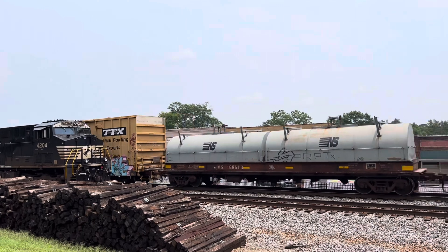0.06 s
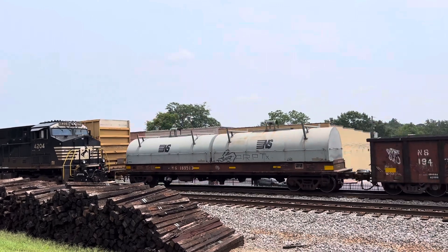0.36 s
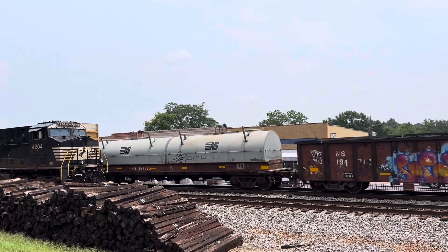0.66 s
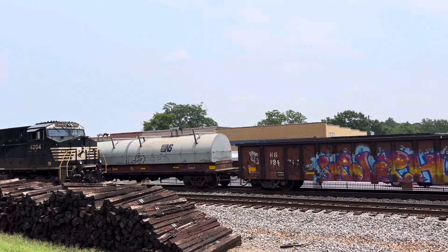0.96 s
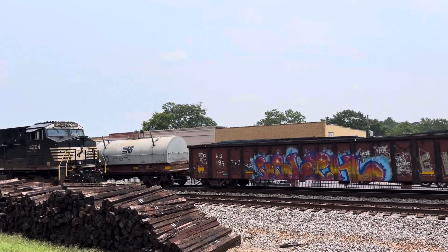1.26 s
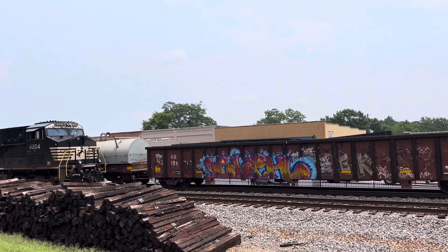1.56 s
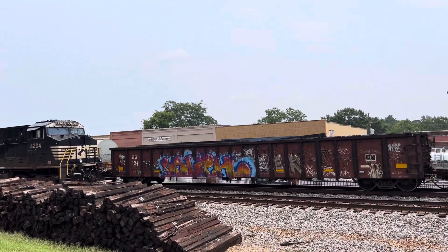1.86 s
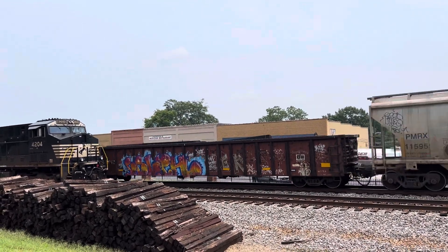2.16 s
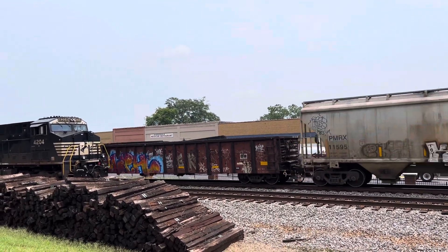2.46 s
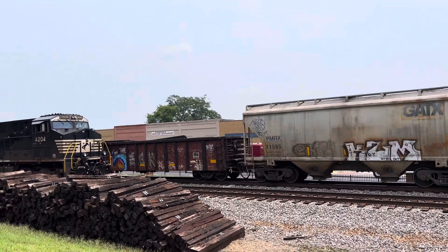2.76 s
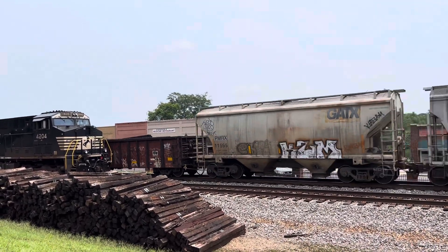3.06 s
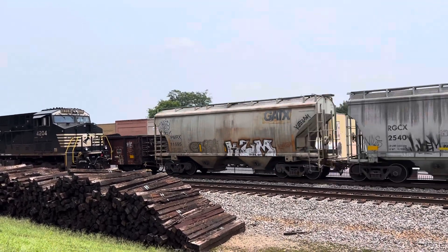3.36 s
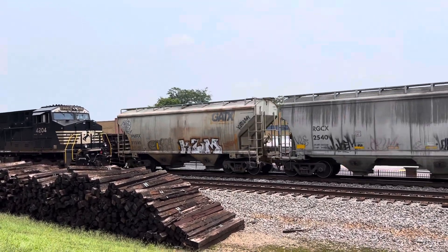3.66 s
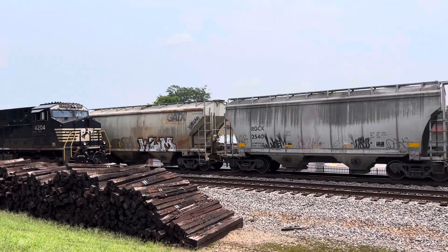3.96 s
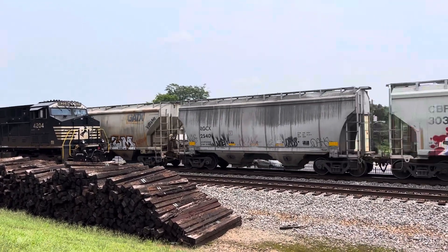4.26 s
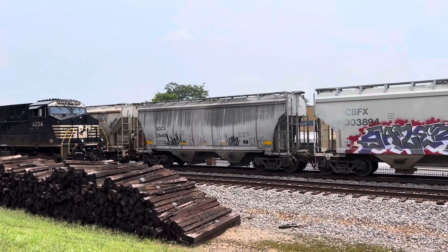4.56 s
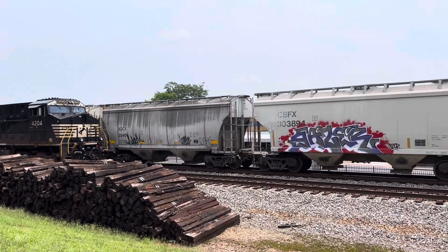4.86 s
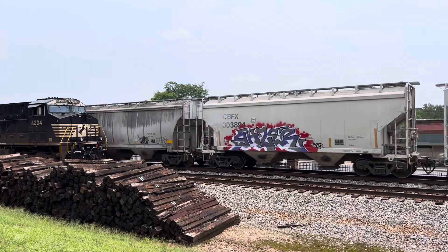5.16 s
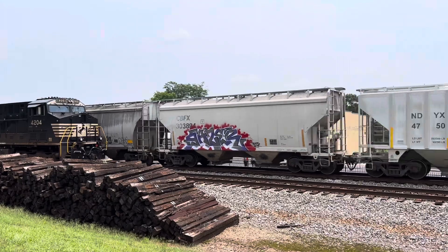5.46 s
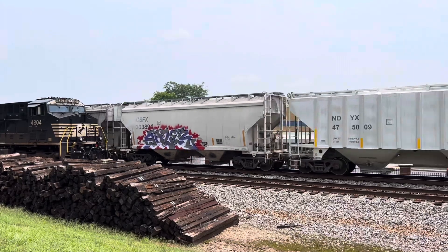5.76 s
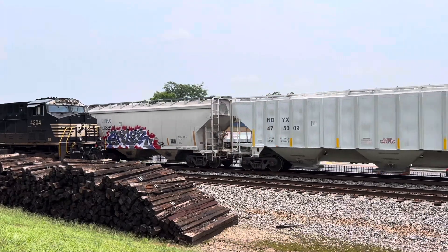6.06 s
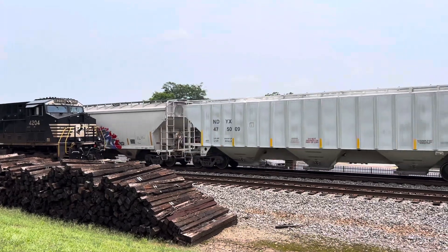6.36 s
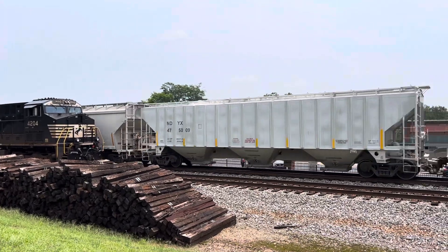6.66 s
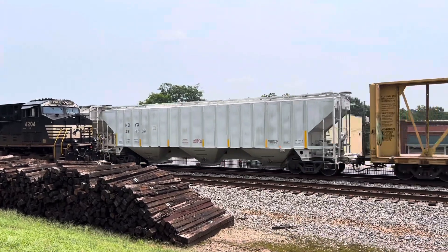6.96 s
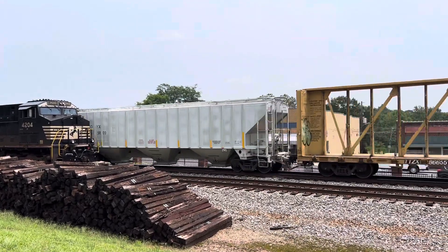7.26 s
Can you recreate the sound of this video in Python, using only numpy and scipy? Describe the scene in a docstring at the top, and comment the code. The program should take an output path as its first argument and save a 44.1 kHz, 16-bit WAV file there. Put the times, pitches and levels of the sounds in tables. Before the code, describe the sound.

A freight train rolls steadily past with a deep rumble, rattling wagons, knocks and the ringing hiss of steel wheels.

```python
"""A freight train rolls past at a steady speed, some twenty metres away across open ballast.
Its hollow wagon bodies boom on their springs, their walls drum, and slack running gear knocks.
Rough treads force track bed, rails and steel wheels into vibration: a roar, a ringing and a hiss.
The roar grows wagon by wagon and throbs with each turn of the wheels. Near the end one rough wheel
draws near from the right, grinding and scuffing in quick swells, with a loud clank and a faint one."""
import sys
import numpy as np
from scipy import signal
from scipy.fft import rfft, irfft, next_fast_len
from scipy.io import wavfile
from scipy.ndimage import uniform_filter1d, map_coordinates

SR = 44100
rng = np.random.default_rng(int(sys.argv[2]) if len(sys.argv) > 2 else 0)


def to_wav(sig):
    """Store sig (one row per channel, or 1-D mono) as 16-bit WAV at the path in sys.argv[1].

    Samples outside -1..1 are clipped; the rate is SR.
    """
    pcm = np.clip(np.atleast_2d(sig), -1, 1) * 32767
    pcm = np.round(pcm).astype(np.int16)
    wavfile.write(sys.argv[1], SR, pcm.T)  # frames by channels


N = 325899
TIME = np.arange(N) / SR

# coherence of the two channels: f/Hz, coherence (0-1)
COHERENCE = [(50, .98), (150, .94), (300, .87), (550, .65), (800, .52), (1100, .62), (1600, .22),
             (1900, .25), (2300, .5), (3000, .4), (4300, .6), (5300, .25), (7200, .35), (8500, .8),
             (12000, .8)]
# the open track lies to the right, so the left channel lags: f/Hz, lag/ms
LEFT_DELAY = [(100, 0), (250, .13), (400, .37), (600, .53), (920, .32), (1250, .32), (2100, .46),
              (2700, .39), (3300, .47), (4500, .43), (6000, .48), (7500, .38), (8500, .355), (11800, .34)]
# boom of the bodies, heavier as each bogie takes its load past: t/s, level/dB
BOOM_LEVELS = [(0, -27.5), (0.55, -27.5), (1.08, -24), (1.2, -22.5), (1.72, -20), (1.87, -27),
               (2.25, -21.5), (2.35, -19.5), (2.87, -21), (3.02, -26), (3.13, -20.5), (3.5, -19),
               (3.8, -17), (4.15, -17.5), (4.42, -20.5), (4.7, -18.5), (5.4, -16), (6.37, -18.5),
               (6.85, -16.5), (7.39, -21.5)]
# weight of the deepest swaying within the boom: t/s, gain/dB
SWAY_DEPTH = [(0, -2), (2.2, 0), (3.6, 6), (5.2, 8.5), (7.39, 5)]
# steady shaking of the walls: t/s, drumming/dB, rattle/dB
WALL_SHAKING = [(0, -29, -31.5), (0.8, -32, -33.5), (1.3, -21.5, -30), (1.85, -25, -33), (2.1, -28, -24),
                (2.27, -22, -28), (2.45, -18.5, -28.5), (2.86, -13, -21), (2.94, -23, -30),
                (3.05, -17.5, -23), (3.35, -17, -22.5), (3.8, -17, -27), (4.45, -22, -26.5),
                (5.25, -21, -26), (5.8, -17.5, -21.5), (6.25, -21, -23), (7.39, -17.0, -21.0)]
# harder shaking over uneven track: t/s, half length/s, drumming/dB, rattle/dB
SHAKING_BOUTS = [(1.665, 0.031, -17, -25), (1.832, 0.065, -17.5, -22.5), (1.986, 0.035, -39, -23),
                 (2.35, 0.032, -18, -29), (2.58, 0.023, -21, -29), (2.723, .04, -15.5, -25),
                 (2.973, 0.018, -10.5, -32), (3.325, .025, -14, -19), (3.56, 0.058, -18, -19.5),
                 (5.03, 0.036, -13, -27), (5.497, 0.06, -16, -19.5)]
# spectra of the bodies' boom and the walls' drumming and rattle: f/Hz, level/dB
BOOM_SPECTRUM = [(20, -39), (31, -34), (40, -18), (50, -9.5), (63, -3), (80, -6), (100, -8.5), (125, -15.5),
                 (190, -40)]
DRUM_SPECTRUM = [(70, -12), (115, 1), (160, 0), (210, -4), (270, -17), (420, -29)]
RATTLE_SPECTRUM = [(150, -13), (240, 0.5), (310, -0.5), (410, -2), (520, -12), (800, -45), (1400, -47)]
# rolling contact: t/s, track bed/dB, rails/dB, wheels/dB, hiss/dB
ROLLING_LEVELS = [(0, -34.5, -43, -37.5, -48), (0.9, -33, -40, -33, -45.5), (1.85, -33, -40, -36.5, -43),
                  (2.25, -31, -37.5, -34.5, -40), (3.4, -27, -37, -34.5, -38),
                  (4.2, -28.5, -35, -31.5, -38.5), (4.9, -28.5, -35.5, -33, -40),
                  (5.5, -26.5, -36, -32.5, -41), (6.25, -24, -40, -34, -38.5),
                  (6.7, -26.5, -39.5, -37, -37.5), (7.39, -23.5, -33.5, -37, -37)]
# spectra of track bed, rails, wheel discs, rims and hiss: f/Hz, level/dB
BED_SPECTRUM = [(300, -12), (450, 2), (570, 3), (780, 1), (880, -0.5), (1000, 0.5), (1150, -13),
                (1500, -18)]
RAIL_SPECTRUM = [(700, -47), (1100, 5), (1400, 6.5), (1700, 1.5), (1950, -12.5), (2500, -17.5)]
DISC_SPECTRUM = [(1000, -26), (1600, 0.5), (1950, 4.5), (2300, 2.5), (2750, 0.5), (3050, -2), (3700, -33),
                 (5000, -23)]
RIM_SPECTRUM = [(2600, -16), (3200, 1.5), (3600, 1.5), (4400, 1), (5000, -0.5), (6000, -2.5), (8000, -10.5)]
HISS_SPECTRUM = [(3500, -16), (6200, 0), (7300, -2), (8500, -.5), (10300, -6), (12600, -6.5), (13600, -20),
                 (15500, -26)]
# upper modes of the wheels: f/Hz, width/Hz, level/dB
UPPER_MODES = [(1746, 150, -2), (1945, 76, 0), (2696, 140, -4), (3120, 115, -3.5), (3316, 82, 1),
               (3964, 120, -3.5), (4450, 150, -11.5), (5050, 140, -9)]
# wheel size, and so pitch, varies from bogie to bogie: t/s, shift/semitones
WHEEL_PITCH = [(0, 0.095), (1.1, 0.06), (2.2, -.25), (3.0, 0.054), (4.3, 0.067), (5.3, 0), (6.4, 0.18),
               (7.39, 0.097)]
# modes of frames and walls: f/Hz, level/dB, T60/s
FRAME_RESONANCES = [(132, 11.5, 0.036), (165.4, 0.5, 0.1), (221, 1, 0.084), (295, -2, 0.049),
                    (343, -2, 0.11), (440, -1, 0.026), (522, -4, 0.035), (666, -6, 0.01),
                    (806, -14.5, 0.021)]
# knocks of the running gear: t/s, deep thud/dB, hollow bonk/dB, hard clack/dB
GEAR_KNOCKS = [(0.257, -31, -27, -14), (1.629, -32, -17.5, -26), (1.978, -22, -12, -21),
               (2.312, -21, -25, -26), (2.399, -18, -18, -26), (2.488, -15.5, -24, -28),
               (2.684, -17, -11, -18), (2.748, -16, -10.5, -13), (2.805, -23, -20, -24),
               (2.842, -13.5, -27, -23), (2.877, -19, -11, -20), (2.902, -10, -18, -24),
               (2.958, -22, -21, -13), (3.098, -15, -16, -22), (3.278, -24, -10, -7),
               (3.343, -8.5, -13.5, -21), (3.391, -24, -23, -5), (3.437, -17, -8, -7),
               (3.465, -19, -18, -18), (3.519, -21, -11.5, -8), (3.598, -23, -13.5, -11),
               (3.834, -13.5, -24, -28), (4.672, -27, -32, -26), (5.24, -17, -23, -15),
               (5.459, -12, -13, -13), (5.572, -14, -26, -18), (5.863, -22, -20, -22),
               (6.112, -28, -20, -9), (6.651, -11, -19, -13), (7.11, -30, -25, -3)]
# heavy lurches of a body on its springs: t/s, peak/dB
BODY_LURCHES = [(0.121, -13), (.944, -7.5), (1.21, -11), (1.322, -10), (1.42, -10), (1.526, -9),
                (1.66, -12), (1.787, -9.5), (2.41, -17), (2.667, -11), (2.759, -9.5), (2.829, -7),
                (3.105, -4), (3.202, -6), (3.313, -7.5), (3.41, -5), (3.489, -14), (3.599, -6),
                (3.689, -10), (3.868, -10), (3.98, -9.5), (4.048, -7), (4.105, -7), (4.218, -7),
                (4.567, -8), (4.902, -8), (4.982, -8), (5.286, -4), (5.397, -14), (5.451, -12),
                (5.801, -11), (6.518, -7), (6.718, -9), (6.972, -8), (7.191, -5), (7.279, -4.5)]
# single wheels singing out: t/s, f/Hz, level/dB, half length/s, purity (0-1)
FLANGE_SQUEAKS = [(0.33, 2150, -40, .1, .1), (.3, 4380, -46, 0.22, .4), (0.557, 3400, -50, 0.17, .3),
                  (0.96, 3340, -41, 0.14, .4), (1.17, 3330, -40, 0.08, 0.6), (1.42, 3320, -41, .15, .35),
                  (0.93, 4300, -46, .12, 0.5), (1.147, 3960, -39, .12, .15), (1.1, 4150, -50, .25, 0),
                  (1.3, 4480, -45, .25, 0), (1.682, 3315, -42, 0.12, 0.4), (1.653, 3990, -45, 0.12, .5),
                  (1.917, 3925, -47, 0.13, 0.5), (2.3, 3300, -47, .2, .4), (2.39, 4860, -39, 0.047, 0),
                  (2.557, 3090, -48, .3, .2), (2.93, 4030, -42, 0.11, .3), (3.37, 3100, -36, .07, .3),
                  (3.63, 5640, -44, .06, .1), (3.699, 3120, -53, .25, .2), (3.84, 4970, -41, .08, .3),
                  (4.28, 2240, -38, .07, .1), (4.341, 3325, -38, .13, 0.8), (4.9, 3310, -45, 0.23, .3),
                  (5.005, 2620, -40, 0.089, .4), (5.094, 3960, -44, .1, .3), (5.302, 2390, -38.5, 0.087, 0),
                  (5.973, 4380, -39, .08, 0.2), (6.39, 2750, -42, 0.09, .2), (6.412, 3340, -41, .1, 0.06),
                  (6.42, 4520, -47, .14, 0), (6.659, 4020, -37, .04, 0), (6.951, 3140, -45, 0.11, .2),
                  (7.36, 2190, -35, .07, 0), (7.37, 2740, -34.5, .06, 0)]
# modes of one bogie's worn wheels: f/Hz, width/Hz, level/dB
WORN_WHEEL_MODES = [(1310, 170, -1), (1465, 60, 1.5), (1625, 70, -1), (2180, 110, -2), (4170, 90, -11),
                    (4530, 90, -9), (5020, 80, -8)]
# hopper wagons going by: t/s, half length/s, level/dB
HOPPER_PASSES = [(4.848, 0.54, -25), (6.805, 0.73, -21)]
# their resonances: f/Hz, width/Hz, level/dB
HOPPER_RESONANCES = [(167, 25.6, 0.5), (370, 113, -14.5), (436, 55, -14.5), (565, 65, -21.5),
                     (712, 100, -18), (875, 150, -20.5)]
# approach of the rough wheel: t/s, left lag/ms, grinding/dB, ringing/dB
ROUGH_APPROACH = [(5.5, 0.43, -52, -61), (5.88, 0.26, -27, -46), (6.3, 0.24, -30, -37),
                  (6.75, 0.24, -26, -44), (7.0, 0.2, -25, -37), (7.39, 0.11, -31.5, -47)]
# its swells, about one a turn: t/s, grinding/dB, ringing/dB
ROUGH_SWELLS = [(6.4, -36, -32.5), (6.64, -25, -36), (6.885, -21, -37), (7.07, -33, -44),
                (7.385, -20.5, -33)]
# spectra of its grinding, ringing and scuffing: f/Hz, level/dB
GRIND_SPECTRUM = [(420, -4), (700, -3.5), (860, 3.5), (1010, 2), (1150, -5), (1420, 0), (1570, 6),
                  (1700, -11.5), (2150, -5), (2700, -16)]
RING_SPECTRUM = [(2100, 3.5), (2450, 1), (2760, -1), (2920, -7), (3110, -6), (3350, 4), (3650, 5),
                 (4000, 7), (4600, 0), (5500, -21.5)]
SCUFF_SPECTRUM = [(400, 9), (900, 7), (1350, 7), (1580, 11), (1800, 2), (2200, -2), (3200, 12), (4500, 7.5),
                  (7000, 6.5), (8500, 7.5), (10500, 1), (12500, -2), (15500, -12)]
# its rough patch rubbing the rail: t/s, peak/dB
PATCH_SCUFFS = [(6.311, -31), (6.375, -31), (6.545, -34), (6.625, -37), (6.862, -30), (6.893, -28),
                (6.912, -34), (7.04, -29), (7.108, -28.5), (7.139, -29)]
# its flat meeting the rail: t/s, level/dB
FLAT_CLANKS = [(6.867, -15.5), (7.035, -27)]
# modes that ring in a clank: f/Hz, level/dB, T60/s
CLANK_RESONANCES = [(1010, -6, 0.32), (1320, -5, 0.33), (1410, -10, .2), (1575, 1, 0.36), (2160, -13, .2),
                    (2649, -12, .2), (3962, -15, .2)]


def from_db(db):
    """Amplitude ratio of a level in decibels."""
    return np.exp(np.asarray(db) * np.log(10) / 20)


def rms_one(x):
    """Normalisation to unit rms."""
    return x / np.sqrt(np.mean(x ** 2) + 1e-20)


def gains_in_time(rows):
    """Interpolation in time: each level column becomes a gain per sample."""
    times, *levels = np.transpose(rows)
    return [from_db(np.interp(TIME, times, db)) for db in levels]


def with_swells(steady, times, half_lengths, peaks_db):
    """Incoherent addition: bell-shaped swells add to a steady gain in power."""
    power = steady ** 2
    for s, half_s, peak_db in np.broadcast(times, half_lengths, peaks_db):
        near = np.abs(TIME - s) < 3 * half_s
        power[near] += from_db(peak_db) ** 2 * np.exp(-((TIME[near] - s) / half_s) ** 2)
    return np.sqrt(power)


def following(drive, share):
    """Power law: a gain about 1 whose swing in dB is share times that of the drive."""
    return (drive / np.median(drive)) ** share


def drift(rate):
    """Low-passed noise of unit rms, turning about rate times a second."""
    step, settle = 40, 2000
    pole = np.exp(-2 * np.pi * rate * step / SR)
    white = rng.standard_normal(N // step + settle + 2)
    slow = signal.lfilter([1], [1, -2 * pole, pole * pole], white)[settle:]
    return np.interp(np.arange(N) / step, np.arange(len(slow)), rms_one(slow))


def at_hz(points, hz):
    """Interpolation on a logarithmic frequency axis."""
    known_hz, values = np.transpose(points)
    return np.interp(np.log(hz), np.log(known_hz), values)


def colour(points):
    """Spectral envelope: gain against frequency, falling 18 dB an octave beyond the table."""
    low, high = points[0][0], points[-1][0]
    return lambda hz: from_db(at_hz(points, hz)) * np.minimum(1, np.minimum(hz / low, high / hz)) ** 3


def resonances(modes):
    """Modal superposition: gain against frequency as a sum of Lorentzian peaks."""
    return lambda hz: sum(from_db(db) / (1 + (2 * (hz - f) / width) ** 2) for f, width, db in modes)


def point_noise(gain_at):
    """A point source: one channel of coloured noise at unit rms."""
    size = next_fast_len(N, True)
    hz = np.maximum(np.arange(size // 2 + 1) * SR / size, 1)
    return rms_one(irfft(rfft(rng.standard_normal(size)) * gain_at(hz), size)[:N])


def stereo_noise(gain_at):
    """Partial coherence: two channels of coloured noise, the left later, their mean at unit rms."""
    size = next_fast_len(N, True)
    hz = np.maximum(np.arange(size // 2 + 1) * SR / size, 1)
    mid, side = rfft(rng.standard_normal((2, size), dtype=np.float32))
    coherence = at_hz(COHERENCE, hz)
    pair = np.sqrt(1 + coherence) * mid + np.sqrt(1 - coherence) * side * [[1], [-1]]
    pair[0] *= np.exp(-2j * np.pi * hz * at_hz(LEFT_DELAY, hz) / 1000)
    out = irfft((pair * gain_at(hz)).astype(np.complex64), size)[:, :N]
    return out / out.mean(0).std()


def steadied(x, span_s):
    """Division by the running rms evens out swells longer than span_s."""
    return x / np.sqrt(uniform_filter1d(x.mean(0) ** 2, int(span_s * SR)) + 1e-6)


def wall_shaking():
    """Base excitation: uneven track adds bouts to the steady gains of drumming and rattle."""
    drum, rattle = gains_in_time(WALL_SHAKING)
    s, half_s, drum_db, rattle_db = np.transpose(SHAKING_BOUTS)
    return with_swells(drum, s, half_s, drum_db), with_swells(rattle, s, half_s, rattle_db)


def wagon_bodies(drum, rattle, sway_hz=62):
    """Forced vibration: hollow bodies sway and boom on their springs; their walls drum and rattle."""
    boom, = gains_in_time(BOOM_LEVELS)
    depth, = gains_in_time(SWAY_DEPTH)
    boom = boom * from_db(2.7 + drift(13.6))
    heave = stereo_noise(colour(BOOM_SPECTRUM))
    sway = signal.sosfiltfilt(signal.butter(2, sway_hz, fs=SR, output="sos"), heave)
    booming = boom * steadied(heave + (depth - 1) * sway, span_s=0.073)
    drum = drum * from_db(-1.16 + drift(8.7))
    drumming = drum * steadied(stereo_noise(colour(DRUM_SPECTRUM)), span_s=0.13)
    rattle = rattle * from_db(-2 + 2 * drift(34))
    rattling = rattle * steadied(stereo_noise(colour(RATTLE_SPECTRUM)), span_s=0.088)
    return booming + drumming + rattling


def wheels_on_rails(bed, rail, wheel, hiss, turn_s=0.2367, crest_s=4.05, throb_db=0.6):
    """Roughness excitation: treads drive bed, rails and wheels; out-of-round wheels throb each turn."""
    turn_phase = 2 * np.pi * (TIME - crest_s) / turn_s + 0.53 * drift(0.7)
    throb = from_db(throb_db * np.cos(turn_phase))
    roar = bed * from_db(-1.2 + 1.7 * drift(8.9)) * stereo_noise(colour(BED_SPECTRUM))
    grind = rail * from_db(0.9 + 1.6 * drift(21)) * stereo_noise(colour(RAIL_SPECTRUM))
    discs = wheel * from_db(-1.6 + 0.83 * drift(14)) * stereo_noise(colour(DISC_SPECTRUM))
    rims = following(hiss, share=0.58) * from_db(-37.5 + drift(8.2)) * stereo_noise(colour(RIM_SPECTRUM))
    sizzle = hiss * from_db(-3 + 1.44 * drift(26)) * stereo_noise(colour(HISS_SPECTRUM))
    toward_right, toward_left = from_db([[-0.94], [0.94]]), from_db([[0.54], [-0.54]])
    contact = from_db(0.49 * drift(26))
    full_throb = throb * (grind + discs + rims * toward_left)
    half_throb = np.sqrt(throb) * (roar * toward_right + sizzle)
    return contact * (full_throb + half_throb)


def wheel_ring(rail, hiss, lowest_hz=1563, width_hz=85):
    """Modal overlap: many wheels of nearly equal size blur each mode into a narrow, fluttering band."""
    lowest_gain = following(rail, share=2) * from_db(-43 + 2 * drift(29))
    lowest = stereo_noise(resonances([(lowest_hz, width_hz, 0)]))
    semitones = np.interp(TIME, *np.transpose(WHEEL_PITCH))
    read_at = np.cumsum(2 ** (semitones / 12))  # resampling shifts the upper modes together
    bands = stereo_noise(resonances(UPPER_MODES))
    upper = np.array([map_coordinates(side, [read_at], order=3, mode="mirror") for side in bands])
    upper_gain = following(hiss, share=0.44) * from_db(-39.5 + drift(3.7))
    return lowest_gain * lowest + upper_gain * upper


def treble_flicker(hiss, pings_per_s=90, low_hz=1700, high_hz=5200, t60=0.21, rise_s=0.002):
    """Damped sinusoids: brief faint pings at random pitches and places make the treble flicker."""
    starts = np.flatnonzero(rng.random(N) < pings_per_s / SR)
    age = np.arange(int(t60 * SR)) / SR
    envelope = from_db(-60 * age / t60) * (1 - np.exp(-age / rise_s))
    out = np.zeros((2, N + len(age)))
    for i, (pitch, strength, place) in zip(starts, rng.random((len(starts), 3))):
        hz = low_hz * (high_hz / low_hz) ** pitch
        gain = from_db(7 * strength) * np.sqrt(low_hz / hz)  # higher pings are weaker
        ping = gain * envelope * np.sin(2 * np.pi * hz * age)
        out[:, i:i + len(age)] += np.outer([np.cos(np.pi * place), np.sin(np.pi * place)], ping)
    return following(hiss, share=0.47) * from_db(-38) * rms_one(out[:, :N])


def ring(clicks, hz, t60):
    """Damped resonator: a unit impulse starts a decaying sine of amplitude 1."""
    radius, angle = from_db(-60 / (t60 * SR)), 2 * np.pi * hz / SR
    feedback = [1, -2 * radius * np.cos(angle), radius ** 2]
    return signal.lfilter([0, np.sin(angle)], feedback, clicks + 1e-18)


def strike_frame(starts, blows_db, spread_db):
    """Impulse response: each blow rings the frame modes in a mix of its own."""
    scatter_db = spread_db * rng.standard_normal((len(starts), len(FRAME_RESONANCES)))
    out = np.zeros(N)
    for k, (hz, mode_db, t60) in enumerate(FRAME_RESONANCES):
        blow_db = blows_db[np.searchsorted([250, 480], hz)]  # thud, bonk or clack, by frequency
        clicks = np.bincount(starts, from_db(blow_db + mode_db + scatter_db[:, k]), N)
        out += (-1) ** k * ring(clicks, hz, t60)
    return out


def running_gear(rattle, jolts_per_s=28):
    """Impact excitation: slack bogies and couplers give hard knocks amid a run of small jolts."""
    s, *blows_db = np.transpose(GEAR_KNOCKS)
    knocks = strike_frame((s * SR).astype(int), blows_db, spread_db=2)
    starts = np.flatnonzero(rng.random(N) < jolts_per_s / SR)
    size_db = 6.7 * rng.standard_normal(len(starts))
    jolts = rms_one(strike_frame(starts, (size_db, size_db, size_db - 7), spread_db=2.5))
    return knocks + from_db(-7.5) * rattle * jolts


def lurches(bounce_hz=63, spread=0.17, half_s=0.018):
    """Mass on a spring: a loaded body drops and bounces for two or three cycles at its own pitch."""
    out = np.zeros(N)
    draws = rng.uniform(-0.62, 1, (len(BODY_LURCHES), 2))
    for (s, peak_db), (tuning, phase) in zip(BODY_LURCHES, draws):
        near = np.abs(TIME - s) < 3 * half_s
        age = TIME[near] - s
        bounce = np.sin(2 * np.pi * bounce_hz * (1 + spread * tuning) * age + np.pi * phase)
        out[near] += from_db(peak_db) * np.exp(-(age / half_s) ** 2) * bounce
    return out


def faint_squeaks(count=40, detune=0.0255, half_s=0.063):
    """Mistuned modes: squeak rows for wheels that each sing on one mode, louder as the hiss grows."""
    when, which, tuning = rng.random((count, 3)).T
    times = when * N / SR
    mode_hz, _, mode_db = np.array(UPPER_MODES)[(which * len(UPPER_MODES)).astype(int)].T
    hz = mode_hz * (1 + detune * (2 * tuning - 1))
    s, *_, hiss_db = np.transpose(ROLLING_LEVELS)
    drive_db = np.interp(times, s, hiss_db - np.median(hiss_db))
    return list(np.broadcast(times, hz, -41.5 + mode_db + drive_db, half_s, 0))


def squeaks(flutter_hz=38, doppler_fall_per_s=0.0177, left_lag_s=0.00022):
    """Friction excitation: a flange brushes the rail; one mode swells and sinks by Doppler shift."""
    out = np.zeros((2, N))
    flutter = drift(flutter_hz) + 1j * drift(flutter_hz)
    wobble = np.sqrt(2) * np.exp(0.62j * drift(13))
    for s, hz, level_db, half_s, purity in FLANGE_SQUEAKS + faint_squeaks():
        near = np.arange(max(int((s - 2 * half_s) * SR), 0), min(int((s + 2 * half_s) * SR), N))
        age = TIME[near] - s
        tone = np.exp(2j * np.pi * hz * (age - doppler_fall_per_s * age ** 2 / 2))
        pure = wobble[near] * np.exp(-2j * np.pi * hz * np.array([[left_lag_s], [0]]))
        rough = flutter[(near + rng.integers(0, N, (2, 1))) % N]  # unlike in the two channels
        modulation = np.sqrt(purity) * pure + np.sqrt(1 - purity) * rough
        out[:, near] += from_db(level_db) * np.exp(-(age / half_s) ** 2) * (tone * modulation).real
    return out


def worn_bogie(pass_s=4.2, half_s=0.45, level_db=-35):
    """Modal excitation: worn treads set more wheel modes clanging while their bogie is near."""
    nearness = with_swells(np.zeros(N), [pass_s], [half_s], [level_db])
    return nearness * from_db(2 * drift(12)) * stereo_noise(resonances(WORN_WHEEL_MODES))


def hoppers(flutter_db=3.5):
    """Resonance: shaken by the rolling, hollow steel hoppers resound as they pass."""
    nearness = with_swells(np.zeros(N), *np.transpose(HOPPER_PASSES))
    return nearness * from_db(flutter_db * drift(6.6)) * stereo_noise(resonances(HOPPER_RESONANCES))


def rough_wheel(flutter_db=1.5, swell_half_s=0.025):
    """Path difference: the left lag shrinks as a grinding, ringing wheel nears from the right."""
    _, *steady = gains_in_time(ROUGH_APPROACH)
    s, *peaks_db = np.transpose(ROUGH_SWELLS)
    grind, sing = (with_swells(gain, s, swell_half_s, db) for gain, db in zip(steady, peaks_db))
    flutter = from_db(flutter_db * drift(31))
    grinding = grind * point_noise(colour(GRIND_SPECTRUM))
    ringing = sing * point_noise(colour(RING_SPECTRUM))
    right = flutter * (grinding + ringing) + scuffs() + clanks()
    lag_s = np.interp(TIME, *np.transpose(ROUGH_APPROACH)[:2]) / 1000
    left = map_coordinates(right, [(TIME - lag_s) * SR], order=3)
    return np.array([left, right])


def scuffs(rise_s=0.0059, grain_db=4.5):
    """Friction noise: a rough patch rubs the rail in a brief, broad, grainy rasp."""
    swell = np.zeros(N)
    age = np.arange(int(10 * rise_s * SR)) / (rise_s * SR)  # in rise times
    for s, peak_db in PATCH_SCUFFS:
        i = int(s * SR)
        swell[i:i + len(age)] += (from_db(peak_db) * age * np.exp(1 - age))[:N - i]
    return swell * from_db(grain_db * drift(150)) * point_noise(colour(SCUFF_SPECTRUM))


def clanks(rise_s=0.007):
    """Free decay: a flat drags onto the rail and the wheel's modes ring out."""
    out = np.zeros(N)
    for s, level_db in FLAT_CLANKS:
        start = int(s * SR)
        age = TIME[:N - start]
        for hz, mode_db, t60 in CLANK_RESONANCES:
            envelope = (1 - np.exp(-age / rise_s)) * from_db(-60 * age / t60)
            out[start:] += from_db(level_db + mode_db) * envelope * np.sin(2 * np.pi * hz * age)
    return out


def scene():
    """Superposition of all the sources; the low sounds are a little stronger on the right."""
    drum, rattle = wall_shaking()
    bed, rail, wheel, hiss = gains_in_time(ROLLING_LEVELS)
    bodies = wagon_bodies(drum, rattle) + lurches() + running_gear(rattle) + hoppers()
    bodies *= from_db([[-0.33], [0.33]])
    rolling = wheels_on_rails(bed, rail, wheel, hiss) + wheel_ring(rail, hiss)
    return bodies + rolling + squeaks() + treble_flicker(hiss) + rough_wheel()


def record(dry, ceiling=0.95, low_cut_hz=30, high_cut_hz=15600):
    """Band limiting and saturation: the microphone drops rumble, rounds peaks and cuts the top."""
    heard = signal.sosfiltfilt(signal.butter(2, low_cut_hz, "high", fs=SR, output="sos"), dry)
    rounded = heard / (1 + (heard / ceiling) ** 6) ** (1 / 6)
    return signal.sosfilt(signal.ellip(10, 0.1, 80, high_cut_hz, fs=SR, output="sos"), rounded)


dry = scene()
out = record(dry)
to_wav(out)
```